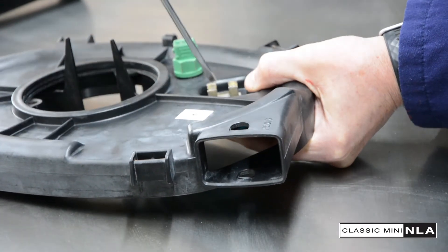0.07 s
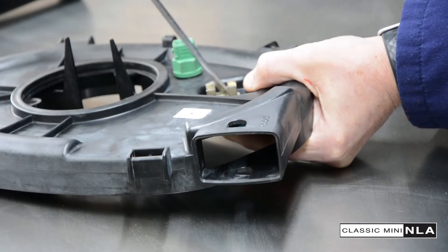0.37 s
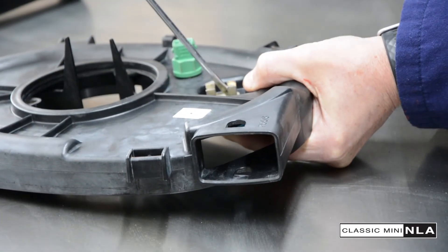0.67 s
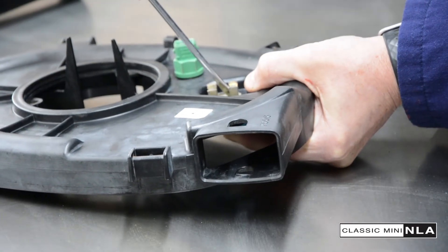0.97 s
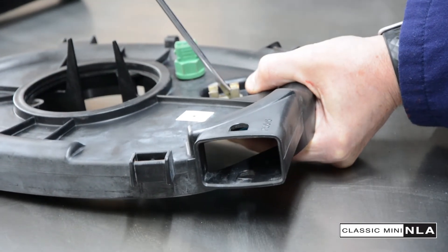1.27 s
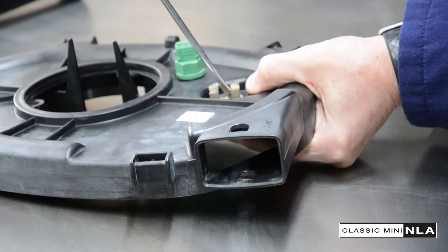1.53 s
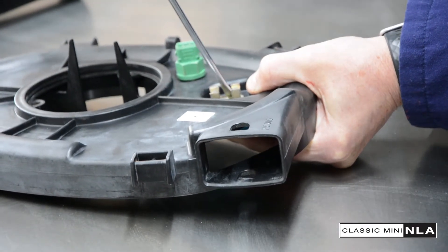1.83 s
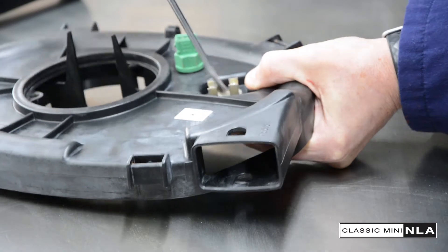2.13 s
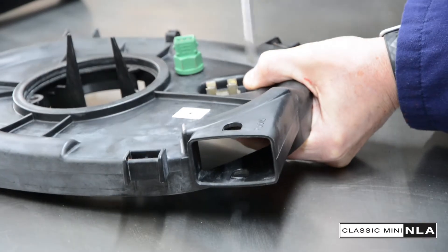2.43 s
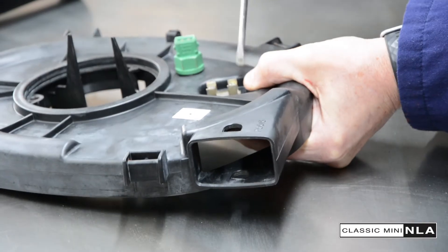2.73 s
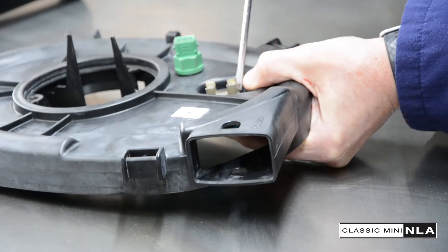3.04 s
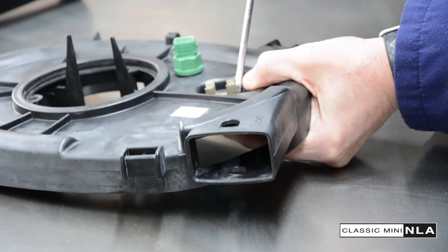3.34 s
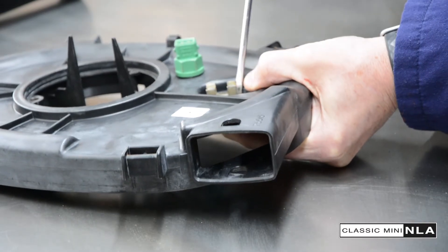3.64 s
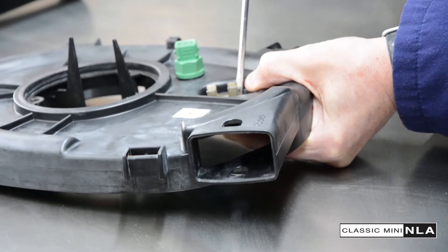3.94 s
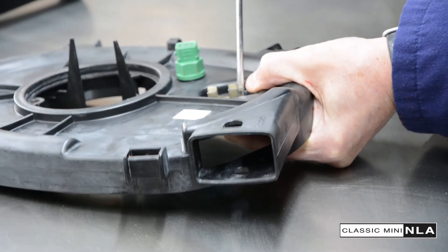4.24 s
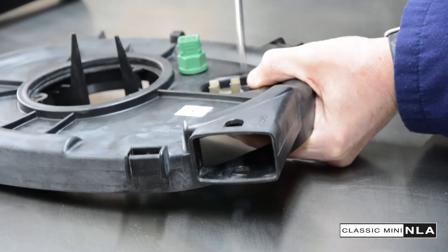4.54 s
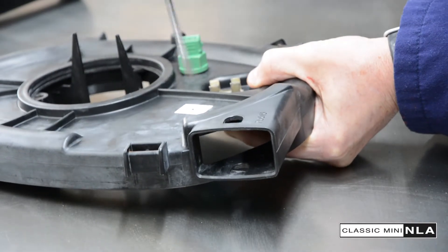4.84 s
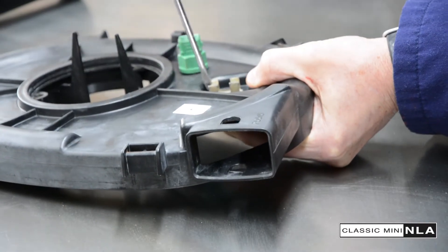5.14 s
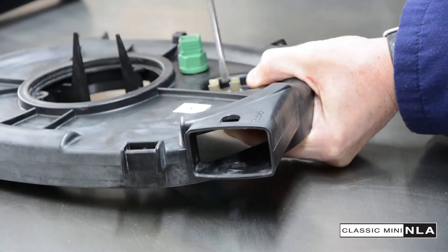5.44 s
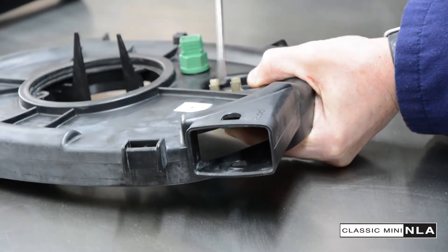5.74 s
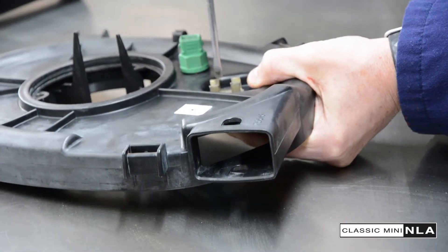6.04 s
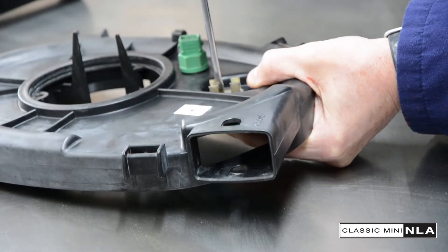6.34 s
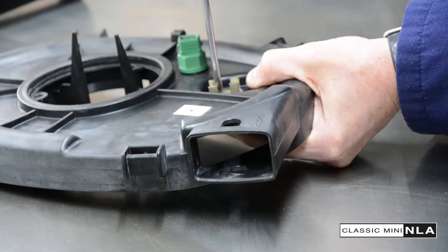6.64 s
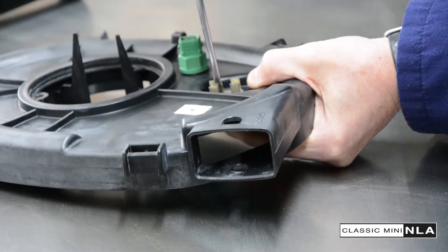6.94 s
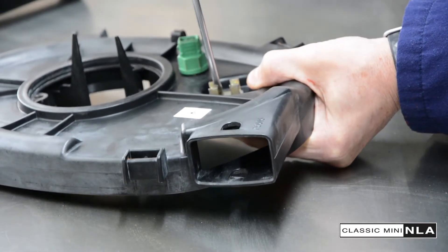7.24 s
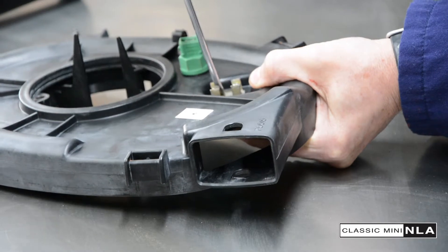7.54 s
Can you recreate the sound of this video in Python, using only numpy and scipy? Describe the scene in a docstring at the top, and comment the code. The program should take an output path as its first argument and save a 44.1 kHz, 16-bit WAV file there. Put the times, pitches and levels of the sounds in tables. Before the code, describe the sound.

Close to the microphone in a small, quiet workshop, a screwdriver presses metal clips into a plastic part. Irregular ticks and tiny scrapes come in clusters with pauses between them. A firm knock of plastic on the bench comes early, one loud sharp snap near the middle, and more light clicking before a closing snap and knock. A very faint hum and thin electrical whine lie underneath.

```python
"""A screwdriver presses small brass clips into a hollow plastic housing, on a bench close to a stereo pair.
The tip ticks and scrapes in runs of tiny slips, clips snap past their catches, one loudly, and the housing
knocks on the bench. Each contact rings brass and plastic, and the small workshop answers briefly.
Well off-mic a machine hums; a thin electrical whine sits in the centre, over soft room tone."""
import sys
import numpy as np
from scipy import signal
from scipy.fft import rfft, irfft, next_fast_len
from scipy.io import wavfile
from scipy.ndimage import uniform_filter1d, map_coordinates

SR = 44100
rng = np.random.default_rng(int(sys.argv[2]) if len(sys.argv) > 2 else 0)


def wav_out(sig):
    """Save sig, one row per channel (or a flat mono array), as 16-bit PCM at SR to the path in sys.argv[1]."""
    wavfile.write(sys.argv[1], SR, np.round(np.clip(np.atleast_2d(sig).T, -1, 1) * 32767).astype(np.int16))


N = 343980
SIZE = 16384  # samples in one contact
T = np.arange(SIZE) / SR
HZ = np.fft.rfftfreq(SIZE, 1 / SR)

# the tip lands on a clip: t/s, slide/s, level/dB, crack/dB, housing f/Hz, housing ring/dB, clip ring/dB
TIP_TAPS = [(0.3486, .005, -1, -11, 890, 10, 15.5), (0.407, 0.0048, -9, -15, 850, 12.5, 1),
            (0.4385, 0, 0.5, -21.5, 900, 6.5, 6), (2.089, 0, -7.5, -11, 840, 7, 6),
            (2.856, 0.014, -6.5, -11, 844, 17, 7.5), (2.974, 0.0026, -10.5, -10.5, 935, 5.5, 5),
            (5.029, 0.00038, 2, -20.5, 920, 0, 9.5), (5.085, 0.0065, -2.5, -14, 930, 11, 11),
            (5.107, 0.01, -7, -13, 860, 5, 8), (5.29, 0.0085, -19, -10.5, 970, 23, 18.5),
            (5.314, .009, -19, -8.5, 930, 5.5, 19), (5.493, 0.0076, -5.5, -9.5, 873, 17.5, 15),
            (5.629, 0, -13.5, -14, 930, 16.5, 14.5), (6.1552, 0.0033, 2, -13, 980, 14, 6.5),
            (6.2199, .003, -7, -9.5, 970, 13, 14)]
# the tip drags over the brass: t/s, slide/s, level/dB, crack/dB
TIP_SCRAPES = [(0.218, .008, -11, -28), (0.256, 0.026, -10, -14), (0.337, 0.031, -13, -13),
               (0.455, 0.022, -7, -12), (2.137, .02, -8.5, -6.5), (2.953, 0.035, -13, -12),
               (4.385, 0.023, -13, -21), (4.57, .017, -30.5, 1), (5.595, .045, -14.5, -13),
               (5.76, .025, -15, -9.5), (5.935, 0.045, -15.5, -11.5), (6.38, 0.032, -19.5, -31),
               (6.678, 0.022, -14, -24)]
# a clip springs past a catch: t/s, slide/s, level/dB, crack/dB, housing f/Hz, tip ring/dB
CLIP_SNAPS = [(1.6796, .002, -2, -3.5, 740, 7.5), (2.097, .0098, 6, -14, 945, 2.5),
              (4.2435, .0005, 26, -7.5, 865, 2), (6.2675, .0037, 5.5, -13, 1520, 13),
              (7.719, .009, 8, -11.5, 1920, 0)]
# the housing knocks on the bench: t/s, level/dB, crack/dB, housing f/Hz
BENCH_KNOCKS = [(2.1835, 16.5, -20.5, 880), (3.075, -15, -36, 840), (4.474, -14, -38, 740),
                (6.781, -26.5, -32, 675), (7.7425, 11, -29, 830)]
CLIP_RESONANCES = [(1963, 0.16, 1), (3352, 0.16, .5), (4740, 0.073, 0.38), (7600, 0.16, .5)]
# narrow modes that every contact rings: f/Hz, level/dB
NARROW_MODES = [(448, -3), (590, -1), (614, -1), (665, -2), (730, 1), (797, -3), (871, 2), (957, -1),
                (1163, -1), (1208, 2), (1269, -2), (1367, 0), (1513, -2), (1864, 0), (2046, -3), (2686, 0),
                (2768, 0), (3400, -1), (4720, 0), (5275, 2), (6980, 1), (7501, 2), (7657, 1)]
# stereo width of the contacts at the microphones: f/Hz, side over mid/dB
CONTACT_WIDTH = [(150, -24.5), (700, -31.5), (1400, -33), (2800, -28.5), (5600, -16), (11000, -7)]
# reverberation of the workshop: f/Hz, t60/s
ROOM_DECAY = [(150, 0.083), (400, 0.3), (900, 0.21), (3000, .175), (8000, .165), (15000, .14)]
# lines of the far machine's hum: multiple of the shaft rate, early level/dB, late level/dB
HUM_LINES = [(4, -72, -66), (5, -75, -77), (7, -81, -86), (8, -73, -67), (9, -77, -74), (11, -74, -75),
             (12, -75, -74), (13, -73, -77), (14, -81, -80), (15, -73, -75), (16, -71, -74), (17, -79, -80),
             (20, -83, -80), (32, -74, -76)]
# the hum's drift from its early balance (0) to its late one (1): t/s, share
HUM_BALANCE = [(3.6, 0), (4.5, 0.98), (5.2, 0.88), (5.8, 0.38), (6.5, 0.48), (7.7, 0.74)]
# spectrum of the room tone: f/Hz, level/dB
ROOM_TONE_COLOUR = [(25, -25), (50, -13), (130, -18), (300, -11), (580, -6), (695, 1), (780, -4),
                    (1100, -4.5), (2000, -9.5), (4000, -16), (8000, -20), (15000, -21.5)]
# stereo width of the room tone: f/Hz, side over mid/dB
ROOM_TONE_WIDTH = [(100, -14), (700, -9.5), (1300, -11.5), (2400, -4.5), (4400, -1), (15000, 1.5)]


def screwdriver(housing_octaves=.23, tip_hz=7000, tip_octaves=.1):
    """Close on the bench: each contact drives housing, clip and steel tip in its own proportions."""
    mid_side = np.zeros((2, N + SIZE))
    width = mid_side_gain(CONTACT_WIDTH, HZ)
    clip = sum(share * bump(hz, octaves) for hz, octaves, share in CLIP_RESONANCES)
    tip = bump(tip_hz, tip_octaves)
    contacts = taps() + scrapes() + snaps() + knocks()
    for start, slide, db, thud_db, crack_db, housing_hz, housing_db, clip_db, tip_db in contacts:
        # the housing radiates little below its ring; harder cracks reach further into the top treble
        bass = [(30, thud_db - 11), (120, thud_db - 4.5), (350, thud_db), (.77 * housing_hz, 0)]
        treble = [(2400, -4.5), (4500, crack_db), (13000, -2.5 + 1.43 * crack_db)]
        rings_db = housing_db * bump(housing_hz, housing_octaves) + clip_db * clip + tip_db * tip
        colour = amp(db + along(bass + treble, HZ) + rings_db)
        # light ticks are dry; heavy blows shake the whole housing and hang on
        spectrum = rfft(slips(slide)) * rfft(blow(shake_db=-3 + .11 * db))
        mid_side[:, round(start * SR):][:, :SIZE] += coloured(spectrum, colour * width)
    return left_right(*mid_side[:, :N])


def taps(thud_db=-24.5, tip_db=-4):
    """Light landings of the tip: little thud, and housing and clip ring freely."""
    return [(start, slide, db, thud_db, crack_db, housing_hz, housing_db, clip_db, tip_db)
            for start, slide, db, crack_db, housing_hz, housing_db, clip_db in TIP_TAPS]


def scrapes(thud_db=-24.5, housing_hz=900, housing_db=7.5, clip_db=6, tip_db=0):
    return [(start, slide, db, thud_db, crack_db, housing_hz, housing_db, clip_db, tip_db)
            for start, slide, db, crack_db in TIP_SCRAPES]


def snaps(thud_db=-21, thud_growth=.25, housing_db=5, clip_db=.5):
    """A clip gives way: a broad crack rings the steel tip, and heavier snaps jolt the housing more."""
    return [(start, slide, db, thud_db + thud_growth * db, crack_db,
             housing_hz, housing_db, clip_db, tip_db)
            for start, slide, db, crack_db, housing_hz, tip_db in CLIP_SNAPS]


def knocks(slide_s=.0033, thud_db=-6, housing_db=11, clip_db=-1, tip_db=0, softening=.31):
    """Plastic on the bench, short and dull: the softer the knock, the more it is thud and housing ring."""
    return [(start, slide_s, db, thud_db - softening * db, crack_db,
             housing_hz, housing_db - softening * db, clip_db, tip_db)
            for start, db, crack_db, housing_hz in BENCH_KNOCKS]


def slips(slide_s, rate_hz=900, scatter_db=2, touch_db=9):
    """The force of a contact: a first touch, then a run of tiny slips while the surfaces slide."""
    step = np.arange(1 + int(slide_s * rate_hz))
    jitter, size = rng.random(256)[step], rng.standard_normal(256)[step]
    times = (step + jitter * (step > 0)) / rate_hz
    force = amp(np.where(step > 0, scatter_db * size, touch_db))
    return np.bincount((times * SR).astype(int), force, SIZE)


def blow(shake_db, crack_t60=.016, bounce_s=.0032, bounce_db=-1, room_db=1):
    """One blow as mid and side: a crack and its bounce off the bench, then the room and narrow modes."""
    bounce = amp(bounce_db) * (T > bounce_s) * fade(np.abs(T - bounce_s), crack_t60)
    crack = unit_energy((fade(T, crack_t60) + bounce) * rng.standard_normal((2, SIZE)))
    return crack + amp(shake_db) * (amp(room_db) * room_tail() + ringing())


def ringing(level_db=-19, t60_at_1khz=.15, scatter_db=1.1):
    """The narrow modes ring on after a blow; high ones die sooner."""
    mode_hz, mode_db = np.transpose(NARROW_MODES)
    t60 = t60_at_1khz * (1000 / mode_hz[:, None]) ** .15
    phase = rng.uniform(0, 2 * np.pi, (2, len(mode_hz), 1))
    modes = unit_energy(np.sin(2 * np.pi * mode_hz[:, None] * T + phase) * fade(T, t60))
    strength = amp(level_db + mode_db + rng.normal(0, scatter_db, len(mode_hz)))
    return strength @ modes


def room_tail(build_s=.0043):
    """The workshop's near walls answer: diffuse sound builds fast and each band dies at its own rate."""
    hz, t, bands = signal.stft(rng.standard_normal((2, SIZE)), SR, nperseg=256)
    decay = fade(t, along(ROOM_DECAY, hz)[:, None])
    tail = signal.istft(bands * decay, SR)[1][:, :SIZE]
    return unit_energy(tail * (1 - np.exp(-T / build_s)))


def machine_hum(shaft_hz=22.15, gain_db=1.5, scatter_rad=1.3):
    """A machine far off-mic: multiples of its shaft rate, roughly in step so that it throbs once a turn."""
    t = np.arange(N) / SR
    late_share = np.interp(t, *np.transpose(HUM_BALANCE))
    hum = np.zeros(N)
    for multiple, early_db, late_db in HUM_LINES:
        drift_rad, waver_db = .3 * wobble(1), 1.2 * wobble(1.5)
        phase = 2 * np.pi * multiple * shaft_hz * t + scatter_rad * rng.standard_normal() + drift_rad
        line_db = early_db + late_share * (late_db - early_db)
        hum += amp(gain_db + line_db + waver_db) * np.sin(phase)
    return hum


def electrical_whine(hz=15713.3, level_db=-66):
    """A thin, steady electrical whine in the centre of the image."""
    return amp(level_db) * np.sin(2 * np.pi * hz * np.arange(N) / SR)


def room_tone(level_db=-63, split_hz=3000, low_lift_db=.5):
    """Soft workshop noise around the microphones: the lower band wavers a little under a steady hiss."""
    white = rng.standard_normal((2, N))
    mid, side = filtered(
        white, lambda hz: amp(along(ROOM_TONE_COLOUR, hz)) * mid_side_gain(ROOM_TONE_WIDTH, hz))
    noise = left_right(mid, side) / np.std(mid)
    low = filtered(noise, lambda hz: 1 / (1 + (hz / split_hz) ** 4))
    hiss = noise - low
    waver_db = .9 * wobble(2)
    return amp(level_db) * (hiss + amp(low_lift_db + waver_db) * low)


def amp(db):
    """Decibels to gain."""
    return 10 ** (np.asarray(db) / 20)


def fade(t, t60):
    """A decay that loses 60 dB in t60."""
    return np.exp(-np.log(1000) * t / t60)


def unit_energy(x):
    """x scaled so that each channel has energy 1."""
    return x / np.linalg.norm(x, axis=-1, keepdims=True)


def along(points, hz):
    """Points of f/Hz and value, read on a log frequency axis."""
    point_hz, values = np.transpose(points)
    return np.interp(np.log(hz + 1), np.log(point_hz + 1), values)


def bump(centre_hz, octaves):
    """A bell of height 1 around a resonance."""
    return np.exp(-.5 * (np.log2((HZ + 1) / centre_hz) / octaves) ** 2)


def wobble(rate):
    """A smooth random curve, rate knots a second."""
    knots = rng.standard_normal(int(N * rate / SR) + 4)
    return map_coordinates(knots, [np.arange(N) * rate / SR])


def filtered(x, response):
    """x through a filter whose gain is a function of frequency."""
    padded = next_fast_len(N + SIZE)
    return irfft(rfft(x, padded) * response(np.fft.rfftfreq(padded, 1 / SR)), padded)[..., :N]


def causal(gain):
    """The minimum-phase response with this gain: nothing sounds before its cause."""
    cepstrum = irfft(np.log(gain + 1e-6))
    cepstrum[..., 1:SIZE // 2] *= 2
    cepstrum[..., SIZE // 2 + 1:] = 0
    return np.exp(rfft(cepstrum))


def coloured(spectrum, colour):
    """A sound with this broad colour that keeps the fine peaks of spectrum."""
    broad_power = uniform_filter1d(uniform_filter1d(np.abs(spectrum) ** 2, size=90), size=90)
    return irfft(spectrum * causal(colour / np.sqrt(np.abs(broad_power) + 1e-12)))


def mid_side_gain(width, hz):
    """Gains of mid (1) and side for a table of stereo width."""
    return np.array([np.ones(len(hz)), amp(along(width, hz))])


def left_right(mid, side):
    """Mid and side decoded to left and right."""
    return np.array([mid + side, mid - side])


def scene():
    """Bench work up close, over the workshop's background."""
    return screwdriver() + machine_hum() + electrical_whine() + room_tone()


def record(dry, ceiling=.72, top_hz=15900):
    """The left microphone is a little brighter, the loudest peaks round off, and the band ends steeply."""
    tilt = [(5000, 0), (13000, .8)]  # f/Hz, level/dB: up on the left, down on the right
    pair = filtered(dry, lambda hz: amp(np.outer([1, -1], along(tilt, hz))))
    limited = pair / (1 + (pair / ceiling) ** 6) ** (1 / 6)
    return filtered(limited, lambda hz: amp(-60 * (np.maximum(hz - top_hz, 0) / 900) ** 2))


dry = scene()
out = record(dry)
wav_out(out)
```